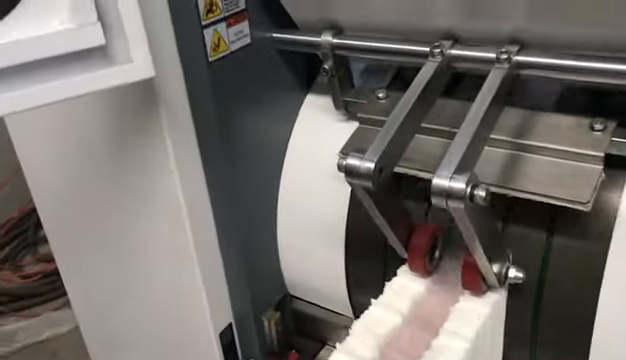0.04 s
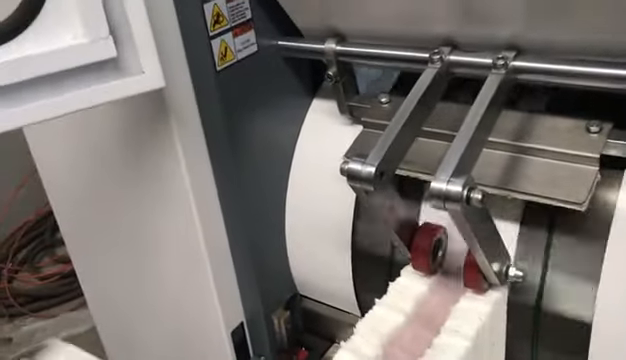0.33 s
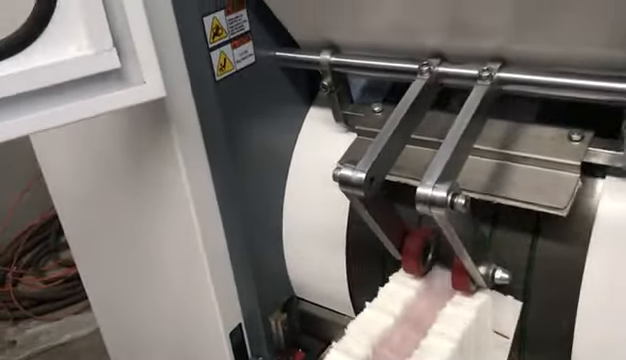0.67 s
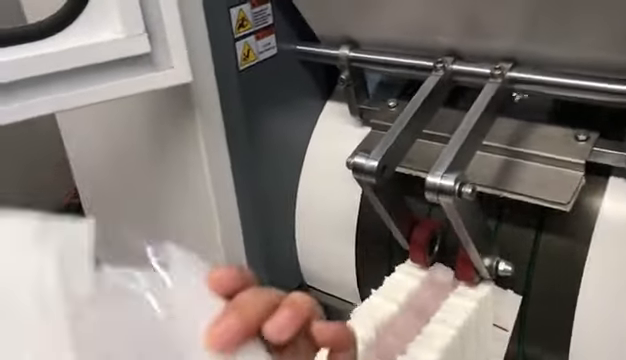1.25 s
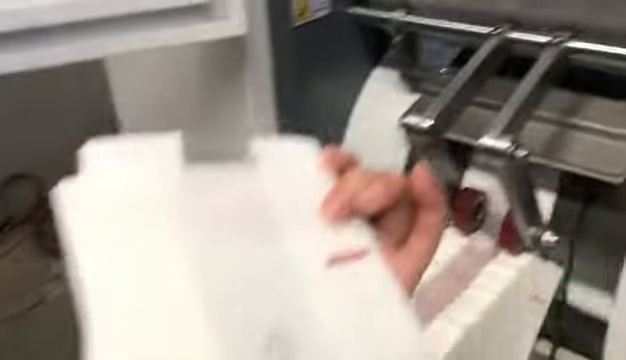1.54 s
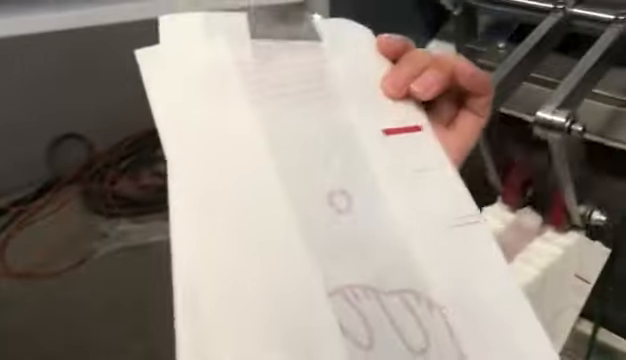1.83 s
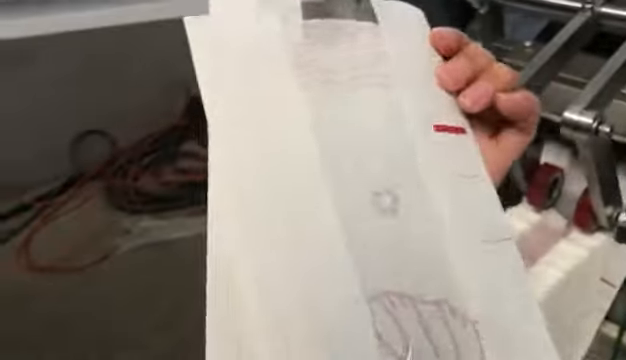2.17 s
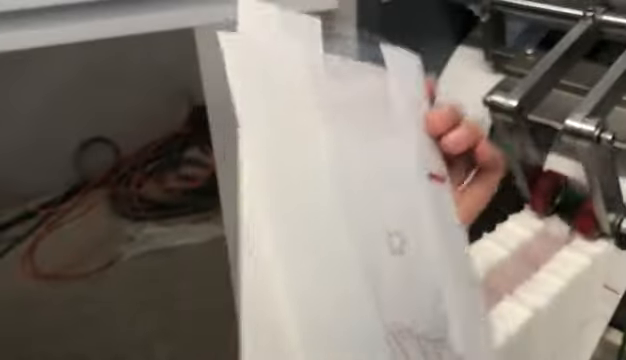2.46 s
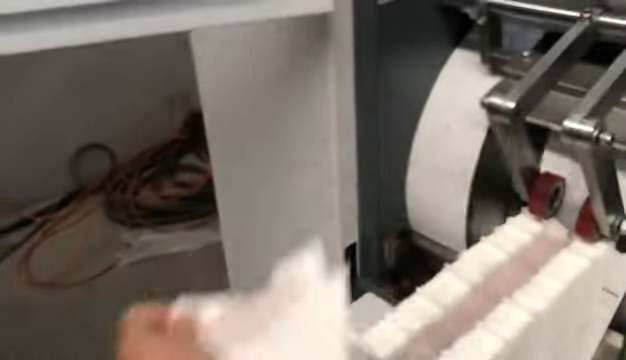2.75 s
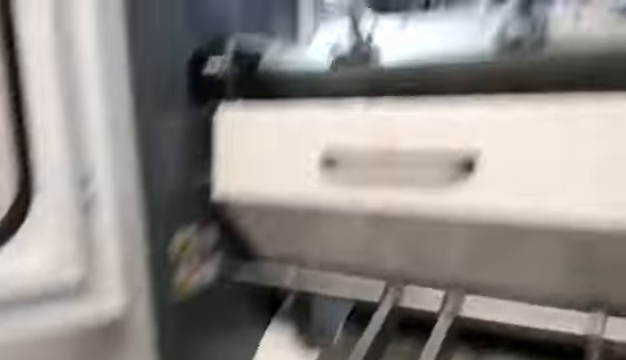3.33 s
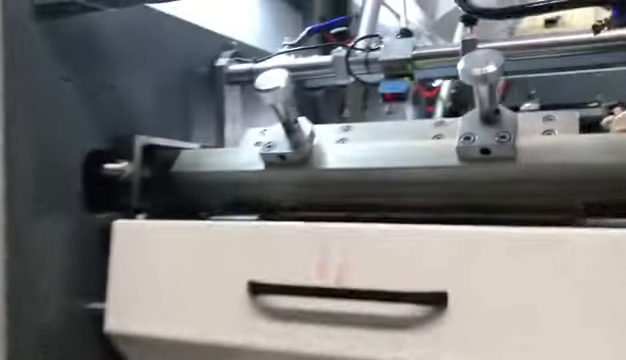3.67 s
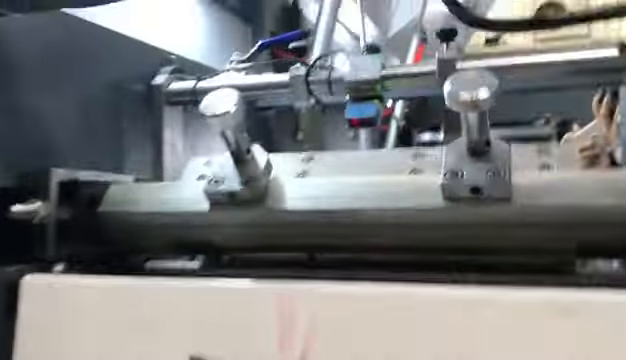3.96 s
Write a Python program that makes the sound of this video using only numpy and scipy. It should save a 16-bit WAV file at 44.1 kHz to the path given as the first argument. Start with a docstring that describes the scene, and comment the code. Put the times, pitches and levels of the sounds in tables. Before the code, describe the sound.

A paper bag machine clacks sharply from the start until about 4 seconds, at a steady five strokes a second, roughly a metre away. Each stroke combines a crisp paper snap, a slap with a short metallic ring, a dull thump and a faint scrape. Underneath, gears rumble, a roller whines thinly and the noise of a factory hall carries on unchanged.

```python
"""Paper snaps off and slaps into the folder of a bag machine, five bags a second, about a metre away.
Each stroke is an impulsive excitation: the tube cracks and rips, the landing bag sets plates and blade
in damped vibration, the frame thumps, and more paper slides on with a hiss of friction.
Cams knock and gears rumble with a period of two bags; a roller whines over the noise of a factory hall."""
import sys
import numpy as np
from scipy import signal
from scipy.fft import rfft, irfft
from scipy.io import wavfile

SR = 44100
rng = np.random.default_rng(int(sys.argv[2]) if len(sys.argv) > 2 else 0)


def waveform_to_disk(signal):
    """Save audio, clipped to [-1, 1], as 16-bit WAV at the path in sys.argv[1]."""
    frames = np.transpose(np.atleast_2d(signal))
    scaled = np.clip(frames, -1, 1) * 32767
    samples = np.round(scaled).astype(np.int16)
    wavfile.write(sys.argv[1], SR, samples)


N = 176400
TIME = np.arange(N) / SR
CYCLE_S, FIRST_S = .19605, -.0136

# Levels in all tables but the hum are relative; level() sets each layer's rms.
# One row per bag (time [s], snap [dB], slap [dB], clang [dB], slide [dB], thump [dB])
BAGS = [(-0.0135, 2, 3, 6.1, 3.5, -13), (0.1805, -1.8, 2.9, 4, 4, -7.5), (0.3783, -0.3, 4.5, 4, 1.8, 0),
        (0.5727, -3.5, 3.7, 2, 5, -6), (0.7713, 0.5, 1, 8, -1, -4), (0.9666, -3, 2, 1.5, -2, -5),
        (1.1621, -2.4, 4.5, 0.5, 5.5, 0.5), (1.3582, -2, 1.7, 0, 0.6, -5.3), (1.5547, -2, 3, 6, -4, -1),
        (1.75, -2.4, 3, 1, -1, -5), (1.947, -1.2, 5.5, 1, -5.0, -1), (2.1432, -1.8, 1, -3, -4, -2),
        (2.3401, -1.2, 2.2, 6.5, -0.5, 0), (2.5347, -2.5, 3.2, -1.5, 2.6, -4.8),
        (2.7313, -3, 4.8, 1.5, -1.8, 1.1), (2.9275, -2.5, 3.5, -1, 1.0, -6), (3.122, 0, 3.5, 4.5, 0.5, 3.5),
        (3.3176, -1.6, 4.7, -2.4, 0, -5.5), (3.516, -2.3, 3.8, 2, -1, 2.5),
        (3.7104, -0.9, 5, 0.3, 2.5, -12), (3.9067, 0.1, 1, 8.5, 0.0, 0)]
# Spectra of the crack and the rip (frequency [Hz], level [dB])
CRACK_SPECTRUM = [(200, -24), (1500, 10), (4500, -30), (5300, 5.5), (6800, -1), (9000, 4.5), (10500, -5.5),
                  (12000, 7), (15500, 2)]
RIP_SPECTRUM = [(200, -5), (700, 5.5), (1500, 1), (3000, -1), (4200, 5), (5100, -1.5), (6800, 6),
                (9000, 1.5), (10500, 0.5), (11500, 2.5), (15500, -5)]
def snap(hold_s=.013, tear_s=.013):
    """Fracture: the taut tube gives a bright crack, then the rest of the perforation rips."""
    times, dbs = np.array(BAGS).T[:2]
    rip = np.zeros(N)
    for s, db in zip(times, dbs):
        near = slice(*np.searchsorted(TIME, [s, s + CYCLE_S]))
        age = TIME[near] - s
        attack = 1 - np.exp(-age / .00033)
        decay = np.exp(-age / .027 - np.maximum(age - hold_s, 0) / tear_s)
        rip[near] += undb(db) * attack * decay
    crack = swells(times + .001, dbs, width_s=.00105) * crackle(rate=20000, spread_db=2)
    fibres = crackle(rate=5000, spread_db=4) * undb(2 * walk(700))
    return level(colour(crack, CRACK_SPECTRUM), -33) + level(colour(rip * fibres, RIP_SPECTRUM), -26)


# Spectra of the paper's slap and the clang's body (frequency [Hz], level [dB])
SLAP_SPECTRUM = [(200, -33), (550, 5.5), (750, -6.5), (1300, -0.5), (2300, 13), (3300, 5.5), (5000, -2),
                 (16000, -25.5)]
CLANG_SPECTRUM = [(300, -18.5), (600, -7.5), (850, -0.5), (1300, -1), (1700, -1), (2500, -18), (6000, -31)]
# Modes of the folder's plates and blade (frequency [Hz], T60 [s], level [dB])
PLATE_MODES = [(810, .08, -12), (930, .06, -14), (1520, .04, -6), (1860, .04, -5), (2040, .07, 0),
               (2265, .085, 1), (2390, .07, -2), (2655, .07, -3), (2840, .05, -6), (3150, .05, -2),
               (3720, .05, -8)]
BLADE_MODES = [(810, 0.054, -3.5), (1260, .03, -30), (1337, 0.049, 5.5), (1470, .03, -1)]
def slap():
    """Impact excitation: the bag hits the folder, whose plates ring and whose blade clangs dully."""
    slap_db, clang_db = np.array(BAGS).T[2:4]
    paper_push = landing(slap_db, delay_s=.016, width_s=.0076)
    plate_push = landing(slap_db, delay_s=.011, width_s=.0048)
    blade_push = landing(clang_db, delay_s=.018, width_s=.0076)
    paper = colour(paper_push * crackle(rate=4000, spread_db=3), SLAP_SPECTRUM)
    plates = ring(plate_push * crackle(rate=3000, spread_db=3), PLATE_MODES)
    blade = ring(blade_push * crackle(rate=3000, spread_db=1), BLADE_MODES)
    body = colour(blade_push * crackle(rate=3000, spread_db=2), CLANG_SPECTRUM)
    return level(paper, -28) + level(plates, -28.5) + level(blade, -32) + level(body, -36)


def landing(dbs, delay_s, width_s):
    """Contact force of each bag: the heavy, even ones land later and press longer."""
    times = np.array(BAGS)[:, 0] + delay_s
    heavy = swells(times[::2] + .0027, dbs[::2], width_s * 1.26)
    return heavy + swells(times[1::2], dbs[1::2], width_s)


# Scrapes within a cycle (time [s], duration [s], level [dB])
SCRAPES = [(0.146, 0.016, 1), (0.156, 0.0056, 1.5), (0.191, 0.0037, 3)]
# Friction spectrum (frequency [Hz], level [dB])
SCRAPE_SPECTRUM = [(500, -19), (1500, -39.5), (4000, 1), (5100, -8), (6800, -4), (10500, -10.5),
                   (15500, -10.5)]
def slides():
    """Sliding friction: the next length of paper scrapes through the guides."""
    slide_db = np.array(BAGS)[:, 4]
    push = 0
    for s, duration, db in SCRAPES:
        jitter = .002 * rng.standard_normal(len(BAGS))
        push += swells(cycles() + s + jitter, db + slide_db, duration / 2)
    return level(colour(push * crackle(rate=4000, spread_db=4.5), SCRAPE_SPECTRUM), -40)


def thump(start_hz=399.8, rest_hz=292, sag_s=.026, t60_s=.22):
    """Damped oscillation, sagging in pitch: the gripper lands on the frame."""
    dbs = np.array(BAGS)[:, 5] + alternate(0, 7)
    out = np.zeros(N)
    for s, db in zip(cycles() + .021, dbs):
        near = slice(*np.searchsorted(TIME, [s, s + 2 * CYCLE_S]))
        age = TIME[near] - s
        hz = rest_hz + (start_hz - rest_hz) * np.exp(-age / sag_s)
        fade = undb(-60 * age / t60_s) * (1 - np.exp(-age / .00044))
        out[near] += undb(db) * fade * np.sin(2 * np.pi * np.cumsum(hz) / SR)
    return level(out, -34)


# Frame modes (frequency [Hz], T60 [s], level [dB])
FRAME_MODES = [(296.4, .16, 0.5), (344, 0.082, -2.5), (391, 0.11, -4)]
def frame():
    """Forced vibration: the frame chatters after each stroke and again on the return."""
    stroke = swells(cycles() + .046, alternate(0, 3), width_s=.018)
    back = swells(cycles() + .0897, 2.5, width_s=.0055)
    return level(ring((stroke + back) * turning(bags=2), FRAME_MODES), -32)


# Delivery table modes (frequency [Hz], T60 [s], level [dB])
DELIVERY_MODES = [(541, 0.27, -5), (551.7, 0.19, 1.5), (616, 0.21, 2)]
def delivery_table():
    """Resonance: the table rings when shaken by the stroke and by the feed."""
    stroke = swells(cycles() + .027, alternate(0, -8), width_s=.018)
    feed = swells(cycles() + .145, -7.5, width_s=.0086)
    return level(ring((stroke + feed) * crackle(rate=3000, spread_db=6), DELIVERY_MODES), -33)


# Knocks within a cycle (time [s], level on even bags [dB], level on odd bags [dB])
CAM_KNOCKS = [(.023, 1.5, -16.5), (0.043, 0, 9), (0.066, -2.5, -3), (.076, 7.5, 6), (.124, 5, 9),
              (0.146, -13, 11), (.16, 3, -7), (.19, 7.5, -9)]
# Housing modes (frequency [Hz], T60 [s], level [dB])
HOUSING_MODES = [(92, .045, -2), (143, .03, 1), (195, .024, -1)]
def cams():
    """Impulse response: cams knock the housing's low, heavily damped modes."""
    knocks = sum(swells(cycles() + s, alternate(even, odd), .00067) for s, even, odd in CAM_KNOCKS)
    housing = ring(knocks, HOUSING_MODES)
    return level(colour(housing, [(25, -12), (80, 11), (400, 7)]), -32)


# Rumble spectrum (frequency [Hz], level [dB])
GEAR_SPECTRUM = [(25, -3), (50, -25.5), (85, 1), (150, 6), (240, -11.5), (310, 6.5), (400, 3.5), (470, -3),
                 (560, -2), (690, -8), (900, -1.5), (1500, -2), (4000, -33.5)]
def gears():
    """Periodic excitation: gear roughness recurs every bag and every second bag."""
    roughness = turning(bags=1) + undb(1.5) * turning(bags=2)
    return level(colour(roughness, GEAR_SPECTRUM) * undb(walk(4.3)), -26.5)


# Shaft and motor tones (frequency [Hz], level [dB])
HUM_LINES = [(145.3, -40.5), (189, -40), (393, -48), (550, -51.5), (918, -44.5)]
def motors():
    """Line spectrum of steady rotation, each tone drifting slightly in phase."""
    return sum(level(np.sin(2 * np.pi * hz * TIME + .34 * walk(4.07)), db) for hz, db in HUM_LINES)


def roller(hz=1962, waver_hz=26):
    """Frequency and amplitude modulation: a wavering whine swells as paper is pulled in."""
    pull = 1 + swells(cycles() + .16, 1, width_s=.035)
    flutter = undb(2.5 * walk(70))
    whine = np.sin(2 * np.pi * np.cumsum(hz + waver_hz * walk(120)) / SR)
    return level(whine * pull * flutter, -37.5)


# Background spectrum (frequency [Hz], level [dB])
HALL_SPECTRUM = [(15, -55), (25, -36), (94, -3.5), (161, 6), (236, 4), (309, 2), (476, -12), (560, 6),
                 (695, -5.5), (1370, -16), (1740, -16), (2000, -4), (4870, -14), (12900, -24), (16000, -32)]
def hall():
    """Broadband noise of air, running paper and other machines, flickering slightly."""
    return level(colour(rng.standard_normal(N) * undb(.66 * walk(40)), HALL_SPECTRUM), -28)


def space(x):
    """Reverberation: close reflections from the machine's panels, then a short tail from the hall."""
    t = TIME[:SR]
    response = np.zeros(SR)
    response[0] = 1
    for t60_s, db, onset_s in ((.08, -9.5, .002), (.21, -9, .015)):
        build_up = 1 - np.exp(-(t / onset_s) ** 2)
        tail = rng.standard_normal(SR) * undb(-60 * t / t60_s) * build_up
        response += undb(db) * tail / np.linalg.norm(tail)
    return signal.fftconvolve(x, response)[:N]


def cycles():
    """Start times of the drive's periods."""
    return FIRST_S + CYCLE_S * np.arange(len(BAGS))


def alternate(even_db, odd_db):
    """Period doubling: one level for even bags, another for odd."""
    return np.resize([even_db, odd_db], len(BAGS))


def swells(times, dbs, width_s):
    """A Gaussian pulse at each time."""
    out = np.zeros(N)
    for s, db in np.broadcast(times, dbs):
        near = slice(*np.searchsorted(TIME, [s - 10 * width_s, s + 10 * width_s]))
        out[near] += undb(db) * np.exp(-.5 * ((TIME[near] - s) / width_s) ** 2)
    return out


def crackle(rate, spread_db):
    """Shot noise: tiny clicks of uneven size at a mean rate per second, rms 1."""
    clicks = (rng.random(N) < rate / SR) * rng.choice([-1, 1], N)
    return level(clicks * undb(spread_db * np.clip(rng.standard_normal(N), -2, 2)), 0)


def turning(bags):
    """Periodic noise: random-phase roughness that repeats after so many bags."""
    size = int(bags * CYCLE_S * SR)
    period = irfft(np.exp(2j * np.pi * rng.random(size // 2 + 1)))
    return level(np.resize(period, N), 0)


def walk(rate):
    """Random modulation: rate Gaussian values a second, joined by straight lines."""
    return np.interp(TIME * rate, np.arange(N), rng.standard_normal(N))


def ring(x, modes):
    """Modal superposition: x drives a sum of damped sinusoids."""
    t = TIME[:SR // 2]
    response = sum(undb(db - 60 * t / t60) * np.sin(2 * np.pi * hz * t) for hz, t60, db in modes)
    return signal.fftconvolve(x, response)[:N]


def colour(x, points, size=8192):
    """Minimum-phase filter through points of (frequency [Hz], level [dB])."""
    hz, db = np.array(points, float).T
    f = np.maximum(np.fft.rfftfreq(size, 1 / SR), 1)
    gain = undb(np.interp(np.log(f), np.log(hz), db))
    cepstrum = irfft(np.log(gain))
    cepstrum[1:size // 2] *= 2  # folding makes the response causal
    cepstrum[size // 2 + 1:] = 0
    response = irfft(np.exp(rfft(cepstrum)))
    return signal.fftconvolve(x, response)[:len(x)]


def level(x, db):
    """Normalisation to an rms level."""
    return x * undb(db) / np.sqrt(np.mean(x ** 2) + 1e-18)


def undb(db):
    """Decibels to amplitude ratio."""
    return 10 ** (np.asarray(db) / 20)


def scene():
    """Superposition: reverberant paper sounds over the drive and the steady noise."""
    paper = space(snap() + slap() + slides())
    drive = thump() + frame() + delivery_table() + cams() + gears()
    return (paper + drive + motors() + roller() + hall())[None]


def record(dry, ceiling=.72, stop_s=3.969, top_hz=16000):
    """Band limiting and soft saturation round the sound, which stops just before the end."""
    thin = signal.sosfilt(signal.butter(2, 48, "high", fs=SR, output="sos"), dry)
    rounded = thin / (1 + (thin / ceiling) ** 4) ** .25
    gate = np.clip((stop_s - TIME) / .002, 0, 1)
    return signal.sosfilt(signal.ellip(10, .2, 80, top_hz, fs=SR, output="sos"), rounded * gate)


dry = scene()
out = record(dry)
waveform_to_disk(out)
```